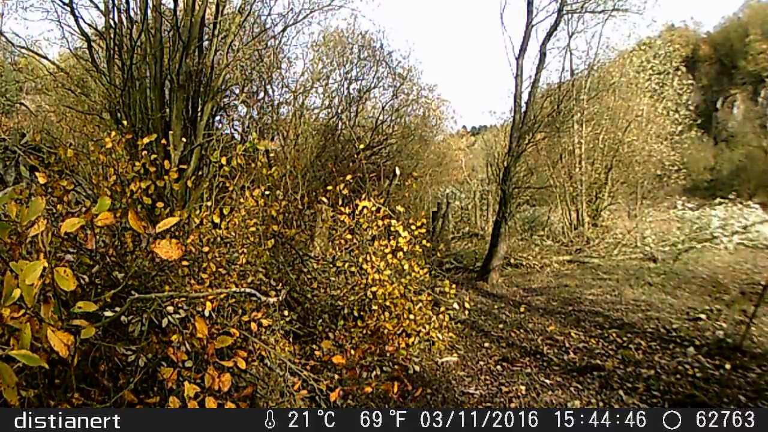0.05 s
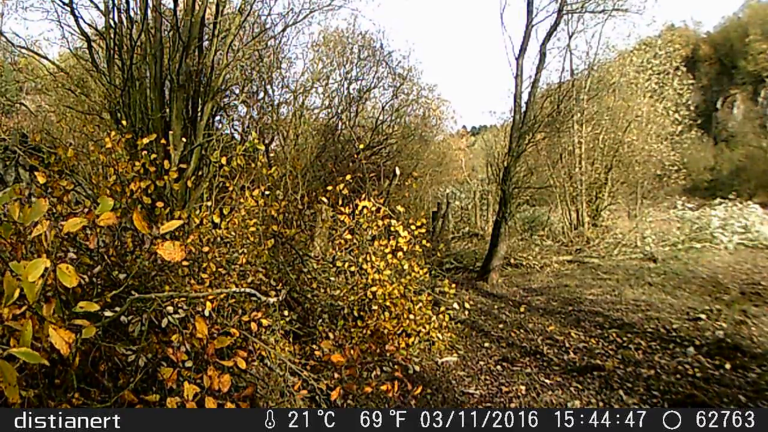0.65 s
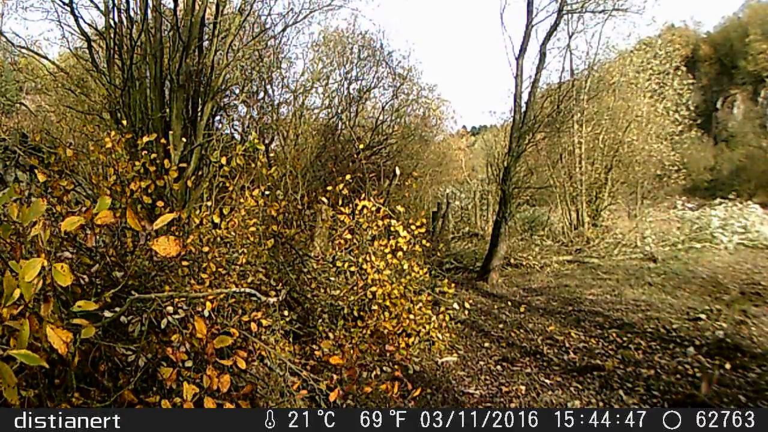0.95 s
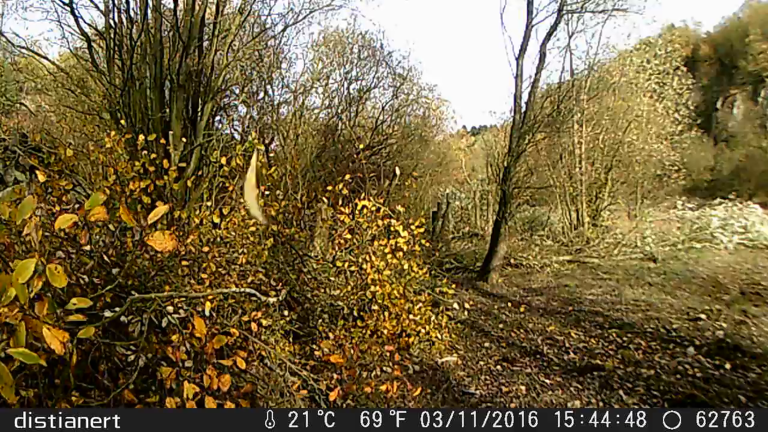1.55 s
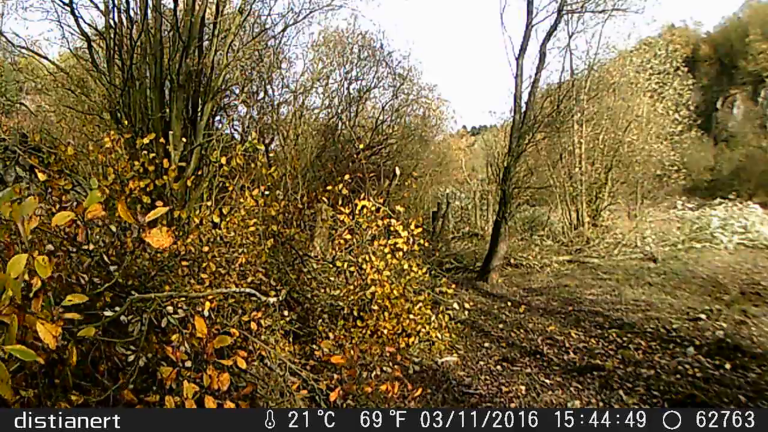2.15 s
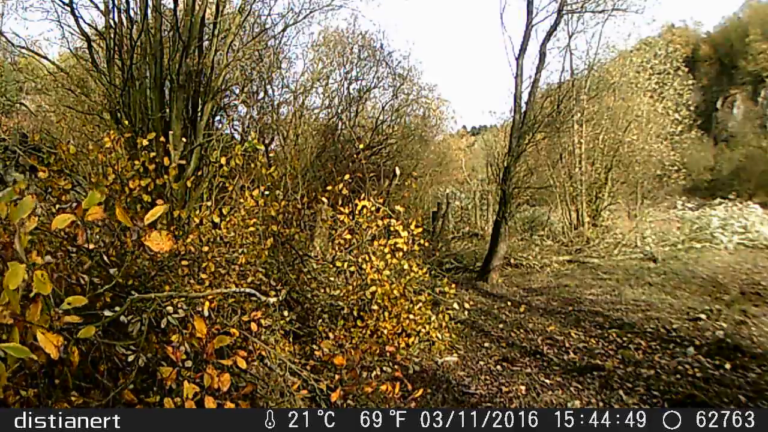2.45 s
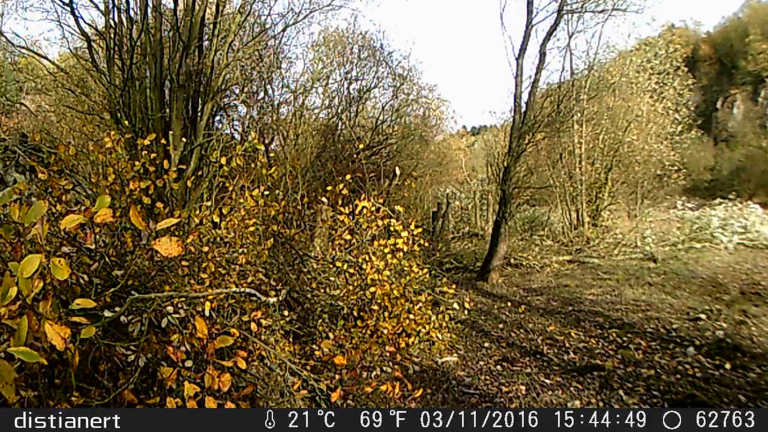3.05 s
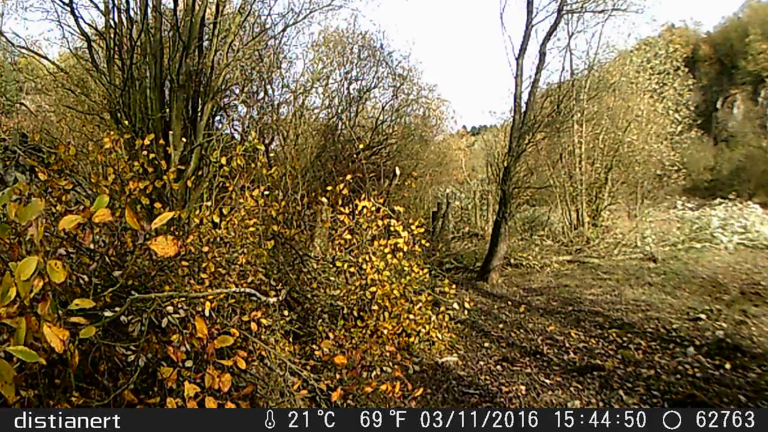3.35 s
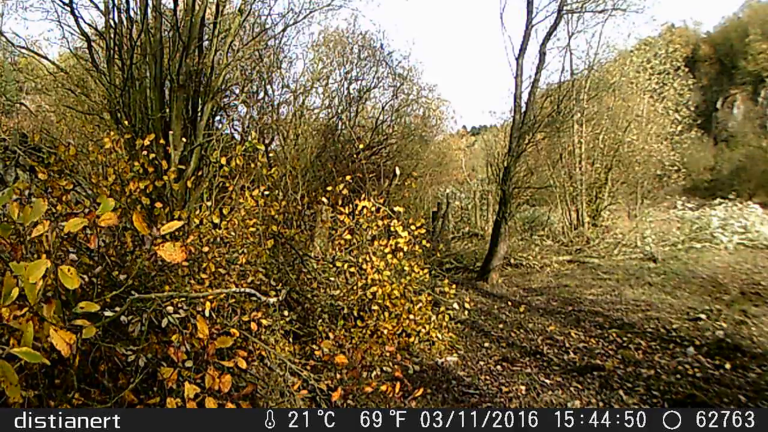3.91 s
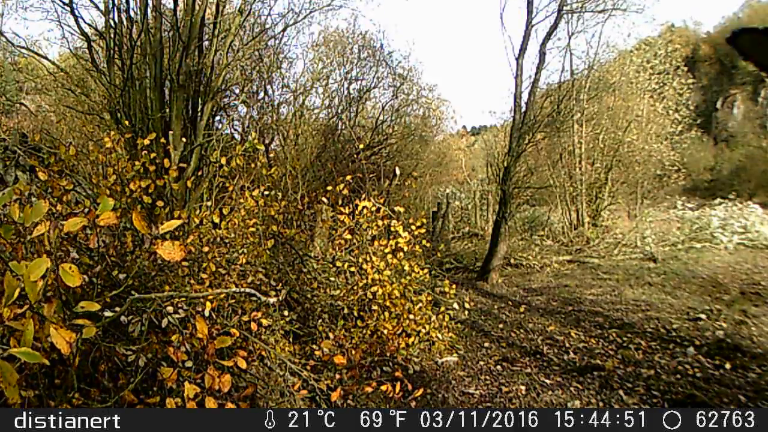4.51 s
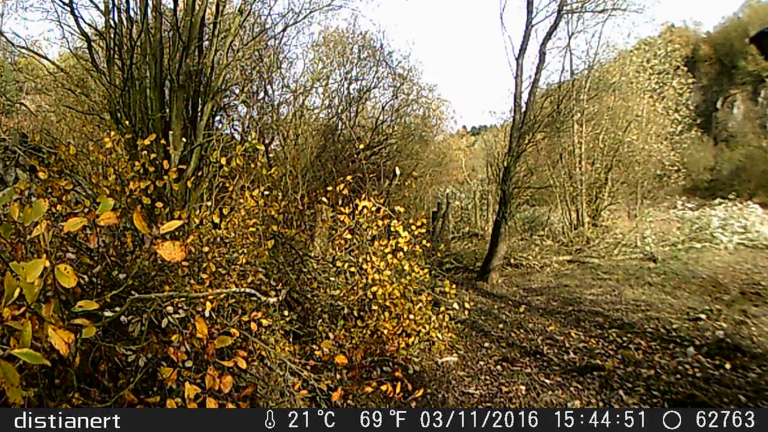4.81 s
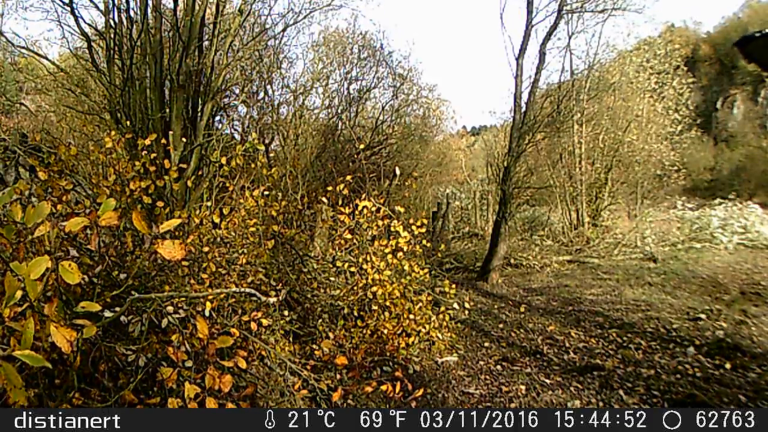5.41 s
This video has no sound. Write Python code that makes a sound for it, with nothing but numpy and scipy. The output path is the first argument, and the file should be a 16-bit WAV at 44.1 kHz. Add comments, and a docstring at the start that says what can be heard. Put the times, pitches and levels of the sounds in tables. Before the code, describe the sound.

Close by in woodland, a two-stroke chainsaw gives a short rev, then coasts to a clanking idle as something bumps the microphone.

```python
"""Two-stroke chainsaw in a wood

Close to a trail camera, the saw revs up, coasts down with its chain still running, then idles,
firing only every few turns. Crank speed sets the pitch: pulses repeat once a turn, and the fixed
resonances of muffler and bar shape them. Bumps, scuffs and the engine's shaking boom in the camera's box."""
import sys
import numpy as np
from scipy import signal
from scipy.fft import rfft, irfft, next_fast_len
from scipy.io import wavfile
from scipy.ndimage import map_coordinates

SR = 44100
rng = np.random.default_rng(int(sys.argv[2]) if len(sys.argv) > 2 else 0)


def int16_out(signal):
    """Quantize to a 16-bit WAV file."""
    q = np.round(np.clip(np.atleast_2d(signal).T, -1, 1) * 32767)
    wavfile.write(sys.argv[1], SR, q.astype(np.int16))


N = 245637
TIME_S = np.arange(N) / SR


def amp(db):
    return 10 ** (np.asarray(db) / 20)


def unit(x):
    return x / np.sqrt(np.mean(x ** 2) + 1e-20)


def along(points, hz):
    """Interpolation of (frequency, value) points on a logarithmic frequency axis."""
    f, v = np.transpose(points)
    return np.interp(np.log(hz + 1), np.log(f + 1), v)


def curve(points):
    """Linear interpolation of (time, value) points at every sample."""
    return np.interp(TIME_S, *np.transpose(points))


def ramp_down(start_s, length_s):
    """A linear fall from 1 to 0."""
    return np.clip(1 - (TIME_S - start_s) / length_s, 0, 1)


def wobble(rate_hz):
    """Smooth random modulation: a spline through Gaussian values."""
    return map_coordinates(rng.standard_normal(int(N * rate_hz / SR) + 4), [TIME_S * rate_hz])


def coloured(x, spectrum, size=16384):
    """Minimum-phase filtering at unit energy: the spectrum sets only the shape."""
    gain = np.maximum(amp(along(spectrum, np.fft.rfftfreq(size, 1 / SR))), 1e-6)
    cepstrum = irfft(np.log(gain))
    cepstrum[1:size // 2] *= 2
    cepstrum[size // 2 + 1:] = 0
    response = irfft(np.exp(rfft(cepstrum)))
    return signal.fftconvolve(x, response / np.linalg.norm(response))[:len(x)]


def resonate(x, *modes):
    """Resonators in series, each (centre_hz, bandwidth_hz); the output has rms 1."""
    for hz, width_hz in modes:
        x = signal.lfilter(*signal.iirpeak(hz, hz / width_hz, SR), x)
    return unit(x)


def pulses(places, sizes):
    """Impulses at fractional sample positions, each shared between two neighbours."""
    places = np.clip(places, 0, N - 2)
    whole, part = places.astype(int), places % 1
    return np.bincount(whole, sizes * (1 - part), N) + np.bincount(whole + 1, sizes * part, N)


def strokes(turns, speed, jitter, scatter_db):
    """A quasi-periodic pulse train: one uneven puff a turn, mean power near 1."""
    at = np.interp(np.arange(np.ceil(turns[0]), turns[-1]), turns, np.arange(N))
    period = SR / speed[at.astype(int)]
    late, size = rng.standard_normal((len(at), 2)).T
    return pulses(at + jitter * period * late, np.sqrt(period) * amp(scatter_db * size))


def gated(turns, fade_db):
    """Amplitude-modulated noise that restarts with every turn and decays through it."""
    return unit(amp(-fade_db * (turns % 1)) * rng.standard_normal(N))


# spectrum of the woodland air: frequency_hz, level_db
AIR_SPECTRUM = [(30, -5.5), (200, 6), (700, -8.5), (1500, -24.5), (3000, -32), (8000, -37)]
def air():
    """Ambient noise: faint, steady and strongest at low frequencies."""
    return amp(-47.5) * coloured(rng.standard_normal(N), AIR_SPECTRUM)


# reverberation time of the wood: frequency_hz, t60_s
WOOD_DECAY = [(300, 0.19), (1000, 0.34), (3000, 0.082), (8000, 0.091)]
def trees(x):
    """Scattering from the trunks gives a short reverberant tail."""
    hz, t, noise = signal.stft(rng.standard_normal(SR // 2), SR, nperseg=256)
    decay = amp(-60 * t / along(WOOD_DECAY, hz)[:, None])
    tail = signal.istft(noise * decay, SR, nperseg=256)[1]
    return signal.fftconvolve(x, tail / np.linalg.norm(tail))[:N]


# brushes against the box: middle_s, level_db, half_length_s
BOX_SCUFFS = [(2.176, -34, 0.0092), (2.257, -40.5, 0.12), (2.585, -39.5, .006), (2.624, -40, 0.023),
              (2.75, -40.5, 0.021), (2.811, -44, 0.016), (3.018, -35, 0.022), (3.116, -43.5, 0.019),
              (3.297, -39.5, 0.017)]
# spectrum of the rubbing: frequency_hz, level_db
SCUFF_SPECTRUM = [(60, -11), (150, 12.5), (320, 12), (700, -8), (1300, -5), (2100, -18.5), (3500, -33)]
def scuffs():
    """Friction noise: something brushes the box in dull, gritty swells."""
    swell = sum(amp(db) * np.exp(-((TIME_S - s) / half) ** 2 / 2) for s, db, half in BOX_SCUFFS)
    grit = unit(rng.standard_normal(N) * amp(3.7 * wobble(300)))
    return swell * coloured(grit, SCUFF_SPECTRUM)


# soft blows on the box: start_s, level_db, pitch_hz, t60_s, rise_s
BOX_BUMPS = [(.375, -6.5, 159.4, 0.28, 0.012), (0.5221, 9.5, 319.4, 0.036, 0.0047),
             (.534, -3.5, 382, 0.068, 0.0024), (0.5449, -9, 351, 0.061, .002),
             (0.627, -16, 120.4, 0.34, 0.014), (0.813, -17, 152.6, 0.23, 0.003),
             (0.851, -11, 30.2, 0.79, 0.013), (2.171, -22.5, 318, 0.09, 0.0044),
             (2.206, -9.5, 152.4, 0.13, 0.018), (2.206, -10, 240, 0.054, 0.0059),
             (2.619, -31, 297, 0.22, 0.0056), (3.037, -23.5, 306, 0.13, 0.0033),
             (3.161, -16.5, 1020, 0.042, 0.0023), (3.172, -25, 180, .08, .004),
             (3.231, -34, 1050, 0.045, 0.0037), (4.943, -19, 163, 0.14, 0.0023)]
def bumps():
    """Damped free vibration: each blow rings one tone, roughened by the scrape of the contact."""
    out, t = np.zeros(N + SR), np.arange(SR // 2) / SR
    for start_s, db, hz, t60_s, rise_s in BOX_BUMPS:
        scrape = resonate(rng.standard_normal(len(t)), (hz, 2.04 * hz), (hz, 0.17 * hz))
        envelope = amp(db - 60 * t / t60_s) * (1 - np.exp(-(t / rise_s) ** 2))
        out[round(start_s * SR):][:len(t)] += envelope * (np.sin(2 * np.pi * hz * t) + 0.3 * scrape)
    return out[:N]


# spells in which the box is jostled: start_s, rise_s, end_s, sway_db, drone_db
BOX_JOSTLES = [(0, 0.0036, 0.3, -25, -10.5), (1.418, 0.01, 1.33, -30.5, -51),
               (2.18, 0.024, 2.28, -31, -36.5), (2.6, 0.033, 3.34, -60, -46), (4.8, 0.54, 5.56, -16, -19)]
def jostling(sway_t60_s=2.75, drone_t60_s=0.74):
    """Gains of sway and drone: spells rise, hold, decay exponentially and add in power."""
    sway, drone = amp(-56), amp(-52)  # at rest
    for start_s, rise_s, end_s, sway_db, drone_db in BOX_JOSTLES:
        onset = np.clip((TIME_S - start_s) / rise_s, 0, 1)
        after_s = np.maximum(TIME_S - end_s, 0)
        sway = np.hypot(sway, onset * amp(sway_db - 60 * after_s / sway_t60_s))
        drone = np.hypot(drone, onset * amp(drone_db - 60 * after_s / drone_t60_s))
    return sway, drone


# response of the box to the engine's shaking: frequency_hz, level_db
DRONE_SPECTRUM = [(45, -21.5), (66, -25.5), (86, 3.5), (120, 3), (160, 0.5), (205, -16), (300, -15.5),
                  (500, -36), (1200, -71)]
def housing(turns, speed, boom_end_s=0.307, swell_db_per_s=26):
    """Forced vibration: the box sways on its mount, drones with the engine and booms in the rev."""
    sway = resonate(rng.standard_normal(N), (31.2, 12.2), (33, 43))
    shaking = strokes(turns, speed, jitter=0.042, scatter_db=5.5)
    drone = unit(coloured(shaking + 1.14 * rng.standard_normal(N), DRONE_SPECTRUM))
    boom = resonate(strokes(turns, speed, jitter=0.14, scatter_db=-0.5), (279, 60), (290, 83))
    boom_db = -6.5 + swell_db_per_s * np.minimum(TIME_S - boom_end_s, 0)
    boom_gain = amp(boom_db) * ramp_down(boom_end_s, length_s=0.025)
    sway_gain, drone_gain = jostling()
    return sway_gain * sway + drone_gain * drone + boom_gain * boom


# the rev, until the throttle is let go: time_s, speed_turns_per_s
REV_SPEED = [(0.0, 140), (0.026, 134.1), (0.08, 146.1), (0.16, 161.3), (0.264, 170.2), (0.43, 198.8)]
# the slowly hunting idle: time_s, speed_turns_per_s
IDLE_SPEED = [(1.68, 45), (1.9, 52), (2.5, 44.5), (3.4, 43), (4, 45.5)]
def crank_speed(drag_s=1.0, friction_turns_per_s2=20):
    """Turns a second: after the rev, viscous drag and dry friction slow the crank to its idle."""
    release_s, top_speed = REV_SPEED[-1]
    offset = friction_turns_per_s2 * drag_s
    coast = (top_speed + offset) * np.exp(-(TIME_S - release_s) / drag_s) - offset
    return np.where(TIME_S < release_s, curve(REV_SPEED), np.maximum(coast, curve(IDLE_SPEED)))


def effort(speed, weak_turns_per_s=90.2):
    """Throttle (0-1) and the levels of exhaust and rasp: radiated power grows with speed and load."""
    throttle = ramp_down(start_s=0.412, length_s=0.075)
    load = ramp_down(start_s=0.28, length_s=0.29)
    weakening_db = 10 * np.log10(1 + (weak_turns_per_s / speed) ** 5.63)
    exhaust_db = -37 + 13 * load - weakening_db
    rasp_db = -40.5 + 10.5 * np.log2(speed / 100) + 9 * throttle
    return throttle, exhaust_db, rasp_db


def chain(turns, speed, powered_hz=3594, quiet_turns_per_s=104):
    """The chain whistles on a cluster of crank harmonics, which widens and sinks as it coasts."""
    throttle, _, rasp_db = effort(speed)
    coasting_hz = 2210 + 8.3 * (speed - 100)
    centre_hz = throttle * powered_hz + (1 - throttle) * coasting_hz
    width_hz = 380 - 250 * throttle
    whine, power = np.zeros(N), np.zeros(N)
    for order in range(12, 34):
        gain = 1 / (1 + abs((order * speed - centre_hz) / width_hz) ** 2.3)
        phase = 2 * np.pi * (order * turns + rng.random()) + 0.15 * wobble(45)
        flicker = amp((3 - 2 * throttle) * wobble(20))
        whine += gain * flicker * np.sin(phase)
        power += gain ** 2 / 2
    running = 1 / (1 + (quiet_turns_per_s / speed) ** 8)
    return amp(rasp_db - 3.5 + 2.5 * throttle) * running * whine / np.sqrt(power)


# idle firings, each an exhaust crack and a metal clank: start_s, crack_db, clank_db
IDLE_FIRINGS = [(1.6181, -49, -39.0), (1.6831, -44.5, -38), (1.75, -45.5, -32.5), (1.829, -45, -32.5),
                (1.9054, -46.0, -32.5), (1.9837, -51, -34), (2.0837, -44, -35.5), (2.1838, -48, -34),
                (2.2883, -43, -34), (2.4925, -49, -37), (2.5635, -44, -33.5), (2.653, -38.5, -33.5),
                (2.7621, -45, -32.5), (2.869, -49, -40), (2.9649, -47, -35.5), (3.0798, -41, -34),
                (3.2102, -47, -38.5), (3.352, -64, -38), (3.426, -53, -36), (3.5394, -45, -36),
                (3.6562, -43, -32), (3.7809, -56, -39.5), (3.8741, -44, -35.5), (3.961, -40, -33),
                (4.1953, -44, -42), (4.3072, -44, -46), (4.3529, -35, -37.5), (4.436, -37.5, -36.5),
                (4.4998, -37.5, -47), (4.5651, -34.5, -32), (4.667, -39.5, -33.5), (4.7468, -35, -35.5),
                (4.811, -39.5, -46), (4.879, -34.5, -41.5), (4.9449, -47.5, -36), (5.0122, -32, -44),
                (5.0767, -46, -44), (5.1201, -45, -38.5), (5.1885, -45, -37.5), (5.3042, -39.5, -36.5),
                (5.44, -34.5, -34), (5.5224, -39, -35.5)]
# slaps of the slack chain on the bar: start_s, level_db
CHAIN_SLAPS = [(1.302, -39.5), (2.114, -41), (2.1665, -43), (2.798, -42.5), (4.034, -43), (4.2645, -45)]
# spectrum of a firing's thump: frequency_hz, level_db
THUMP_SPECTRUM = [(60, -24.5), (250, 4), (650, 1), (1300, -21.5), (4000, -46)]
# spectrum of the exhaust crack: frequency_hz, level_db
CRACK_SPECTRUM = [(1080, -17), (1270, 6.5), (1540, -20), (2400, -12.5), (2850, 1), (3100, -5), (3500, 6),
                  (3820, -2), (4450, 7), (5000, -12.5), (5620, -14), (5900, -1), (6300, -27.5),
                  (7400, -12.5), (8300, -33)]
# resonances of the muffler shell and bar: frequency_hz, level_db
SHELL_SPECTRUM = [(700, -11.5), (1080, -18.5), (1290, -4.5), (1540, -16.5), (2000, -11.5), (2130, -1.5),
                  (2380, -14), (2590, 7), (2850, 2), (3100, -7), (3600, 3), (3820, -10), (3950, -2.5),
                  (4650, -14), (4830, -2.5), (5150, -14.5), (5620, -20.5), (5950, -20.5), (6300, -17.5),
                  (6700, -15.5), (7600, -15.5), (8400, -37.5)]
def firings(turns, snap_t60_s=0.028, clatter_t60_s=0.25):
    """Impulsive excitation: firings thump, crack and clank; the slack chain slaps and jingles."""
    start_s, crack_db, clank_db = np.transpose(IDLE_FIRINGS)
    slap_s, slap_db = np.transpose(CHAIN_SLAPS)
    cracks = pulses(start_s * SR, amp(crack_db))
    clanks = pulses(start_s * SR, amp(clank_db))
    slaps = pulses(slap_s * SR, amp(slap_db))
    out = amp(18) * coloured(np.hypot(cracks, clanks), THUMP_SPECTRUM)
    t = np.arange(SR // 3) / SR
    rise = 1 - np.exp(-t / 0.00025)
    for blows, spectrum in (cracks, CRACK_SPECTRUM), (clanks + slaps, SHELL_SPECTRUM):
        snap = signal.fftconvolve(blows, rise * amp(-60 * t / snap_t60_s))[:N]
        clatter = signal.fftconvolve(blows, rise * amp(-14.5 - 60 * t / clatter_t60_s))[:N]
        links = unit(gated(turns, fade_db=7) * amp(5 * wobble(280)))
        out += coloured(snap * rng.standard_normal(N) + clatter * links, spectrum)
    return out


def crank_turns(speed):
    """Phase is the integral of speed, shifted so that every idle firing falls on a whole turn."""
    turns = np.cumsum(speed) / SR
    at = np.array([round(row[0] * SR) for row in IDLE_FIRINGS])
    slip = np.unwrap(turns[at] % 1, period=1)
    return turns - np.interp(np.arange(N), at, slip)


# hiss and ring of the muffler shell at open throttle: frequency_hz, level_db
RASP_SPECTRUM = [(1000, -30.5), (1750, -20.5), (2100, -2.5), (2350, -17.5), (2560, 2.5), (3140, -13),
                 (3600, -2), (3830, -10.5), (4060, -1.5), (4500, -16.5), (4830, -12), (6100, -23),
                 (7600, -17), (8400, -40.5)]
# strength of the ticking at shut throttle: time_s, gain_db
TICK_GAIN = [(1.05, -3.5), (1.42, 2.5), (1.7, 1), (3.2, -5.5), (4.5, -4.5)]
def rasp(turns, speed, puffs, putter):
    """Shell resonance, driven by gas at open throttle and by piston and chain ticks when it is shut."""
    throttle, _, rasp_db = effort(speed)
    blast = 0.55 * puffs + 0.6 * gated(turns, fade_db=4)
    loaded = amp(-3) * coloured(blast, RASP_SPECTRUM)
    ticks = 0.3 * putter + 0.92 * gated(turns, fade_db=650 / speed)  # fast ticks run together
    coasting = amp(curve(TICK_GAIN)) * coloured(ticks, SHELL_SPECTRUM)
    return amp(rasp_db + wobble(60)) * (np.sqrt(throttle) * loaded + np.sqrt(1 - throttle) * coasting)


# nasal response of the muffler at speed: frequency_hz, level_db
MUFFLER_FAST = [(150, -8.5), (370, -3), (460, 5), (640, 2), (745, 6), (960, -1.5), (1120, -14),
                (1300, -2.5), (1550, -29), (3000, -44)]
# round response of the muffler at idle: frequency_hz, level_db
MUFFLER_SLOW = [(60, -31), (170, 4), (250, 5.5), (350, -2.5), (520, 2.5), (640, -3.5), (780, 0),
                (1050, -22), (1290, -15.5), (1600, -37), (3000, -54)]
def exhaust(turns, speed, puffs, putter):
    """Source and filter: gas pulses and their turbulence excite the muffler's resonances."""
    throttle, exhaust_db, _ = effort(speed)
    racing = amp(-0.5) * coloured(puffs + 0.31 * gated(turns, fade_db=6.5), MUFFLER_FAST)
    idling = amp(5) * coloured(putter + 0.4 * gated(turns, fade_db=16), MUFFLER_SLOW)
    fast = np.maximum(throttle, 0.8 * np.clip((speed - 52) / 30, 0, 1))
    return amp(exhaust_db) * (fast * racing + (1 - fast) * idling)


def engine(turns, speed):
    """The two-stroke cycle gives one pulse a turn: even puffs when fast, an uneven putter when slow."""
    puffs = strokes(turns, speed, jitter=0.004, scatter_db=1.5)
    putter = strokes(turns, speed, jitter=0.035, scatter_db=2.6)
    return exhaust(turns, speed, puffs, putter) + rasp(turns, speed, puffs, putter)


def scene():
    """Superposition of the woodland air, the reverberation, the shaken box and the saw."""
    speed = crank_speed()
    turns = crank_turns(speed)
    saw = engine(turns, speed) + chain(turns, speed) + firings(turns)
    return (air() + amp(-7) * trees(saw) + housing(turns, speed) + bumps() + scuffs() + saw)[None]


def record(dry):
    """Saturation and filtering: the camera overloads softly, with two notches and a steep band limit."""
    notches_hz, top_hz = (3200, 6400), 8350
    size = next_fast_len(N + SR // 2)
    hz = np.fft.rfftfreq(size, 1 / SR)
    clipped = dry / (1 + dry ** 6) ** (1 / 6)
    dips = np.prod([abs(hz - f) / np.hypot(hz - f, 0.019 * f) for f in notches_hz], axis=0)
    band = 1 / np.sqrt(1 + (hz / top_hz) ** 260)
    return irfft(rfft(clipped, size) * dips * band, size)[:, :N]


dry = scene()
out = record(dry)
int16_out(out)
```